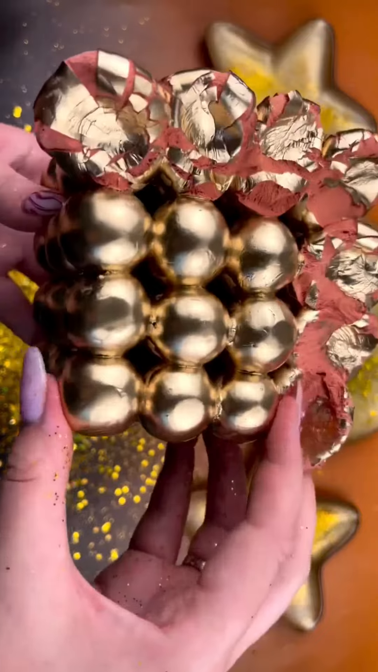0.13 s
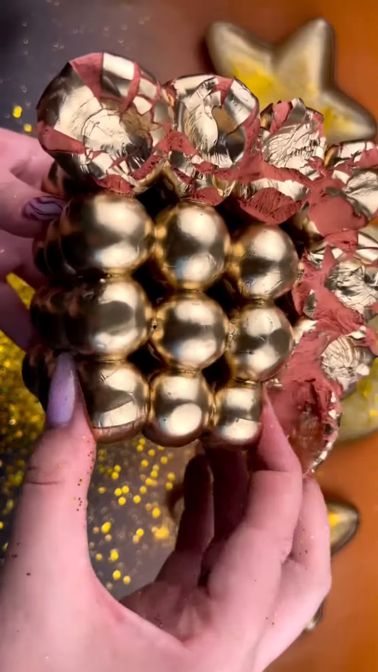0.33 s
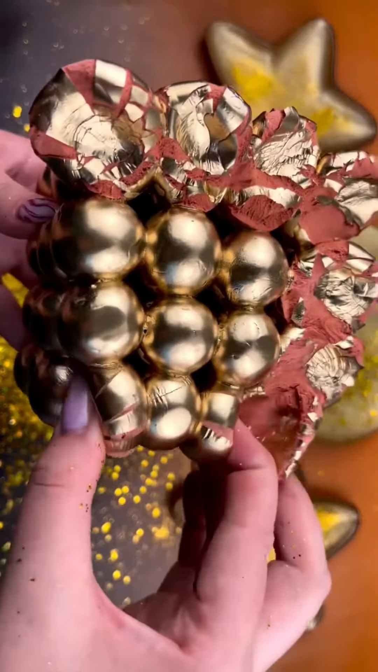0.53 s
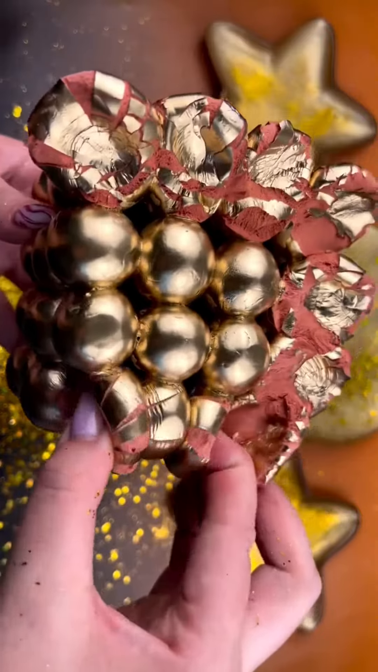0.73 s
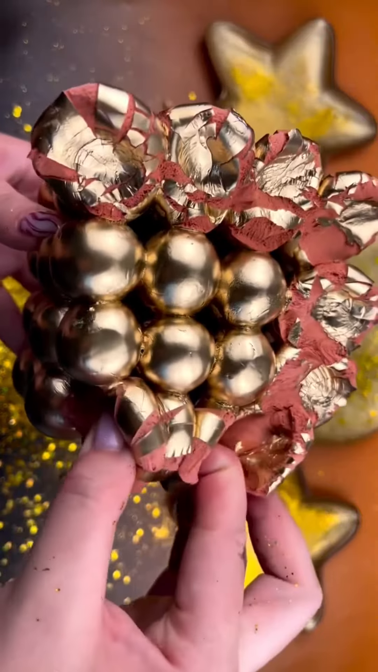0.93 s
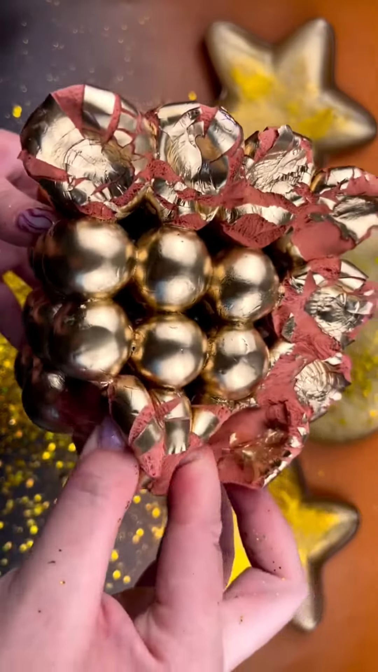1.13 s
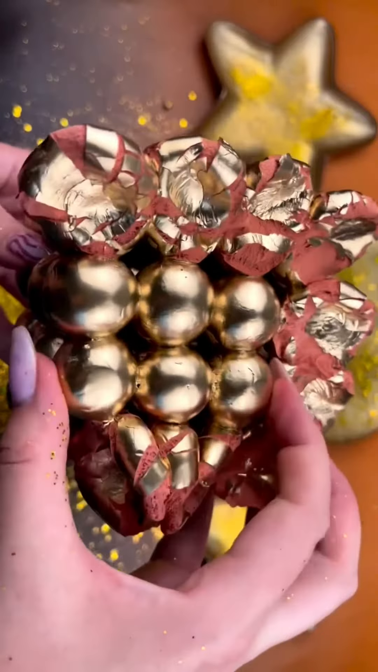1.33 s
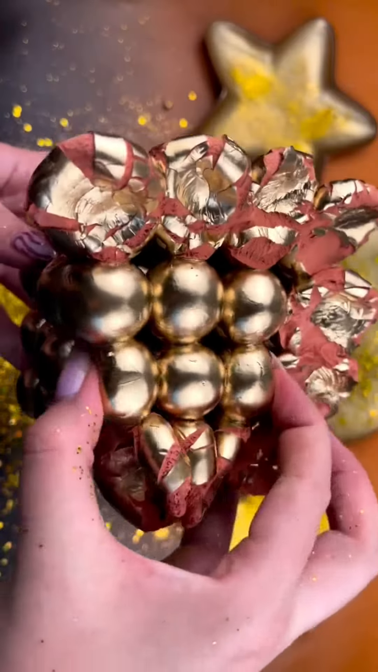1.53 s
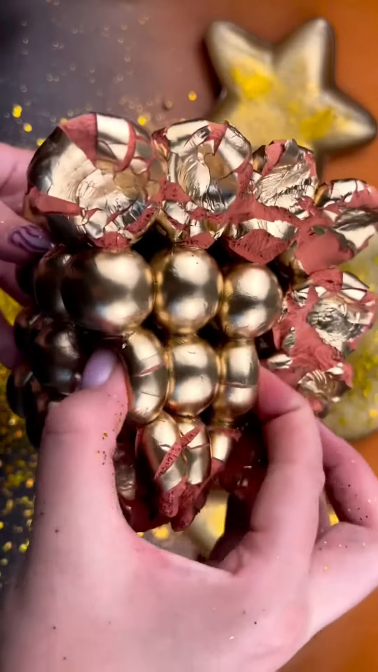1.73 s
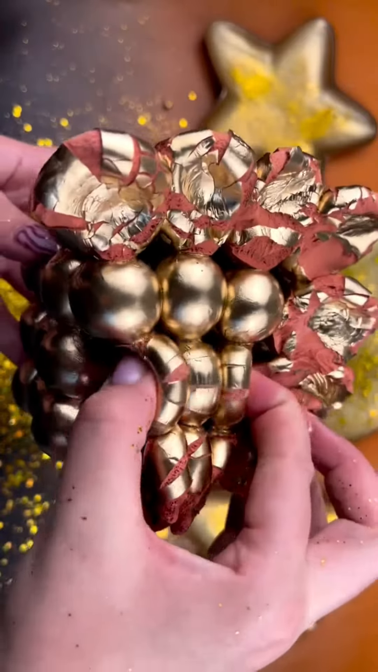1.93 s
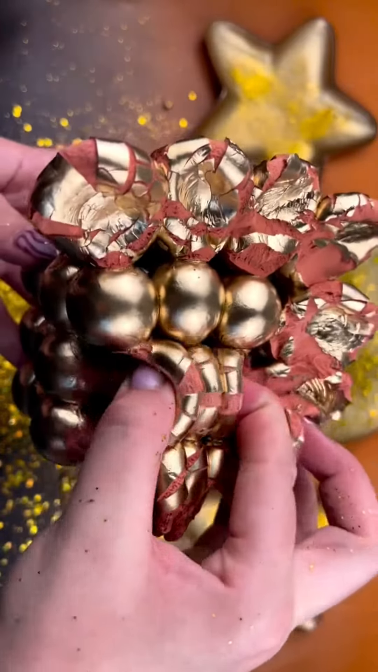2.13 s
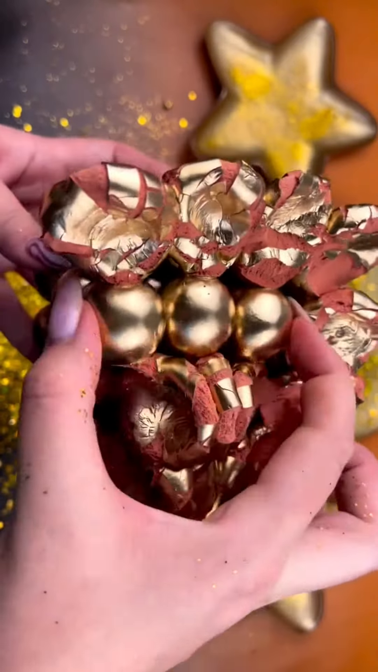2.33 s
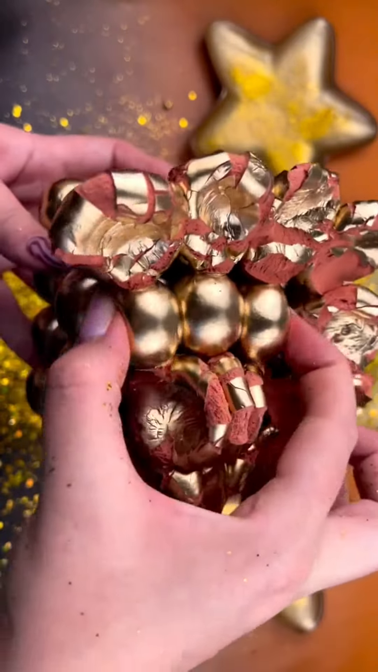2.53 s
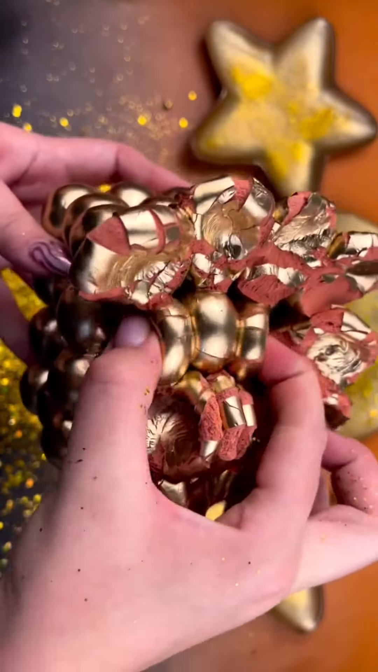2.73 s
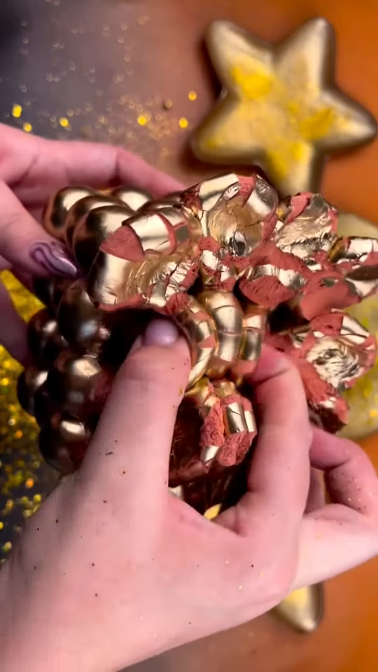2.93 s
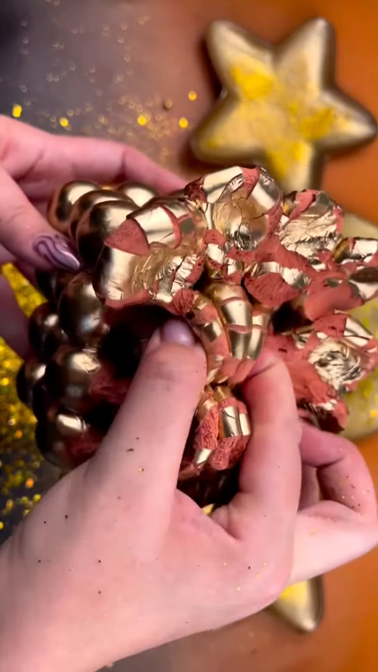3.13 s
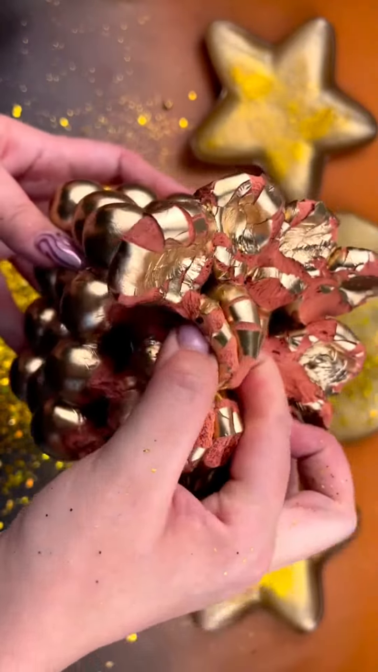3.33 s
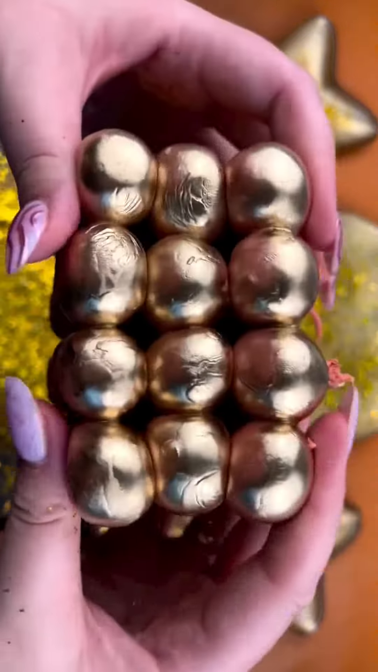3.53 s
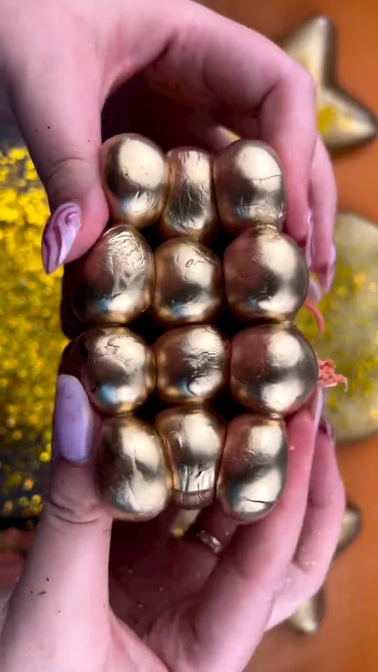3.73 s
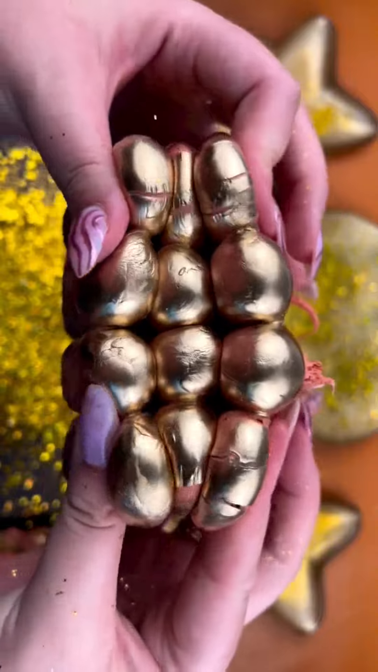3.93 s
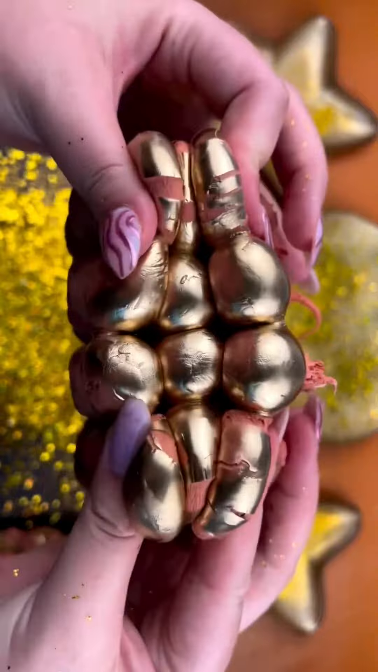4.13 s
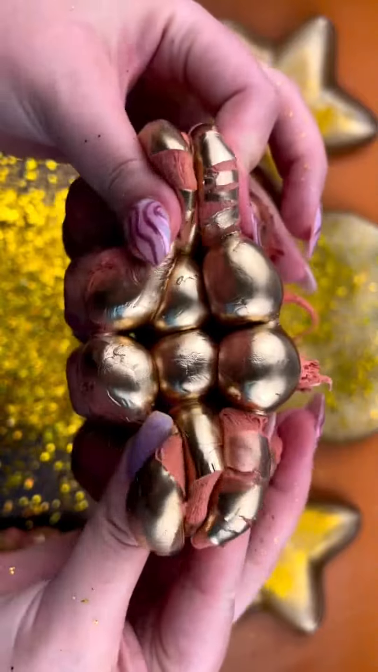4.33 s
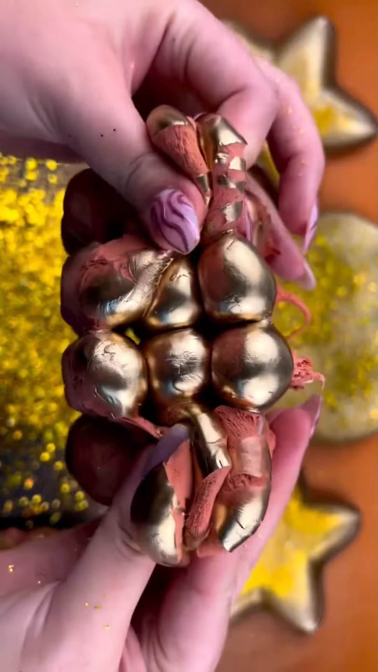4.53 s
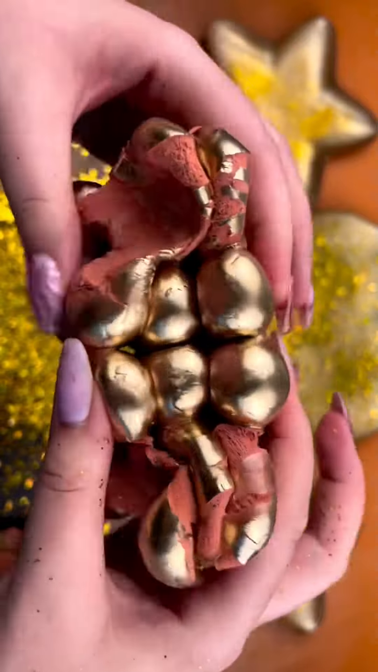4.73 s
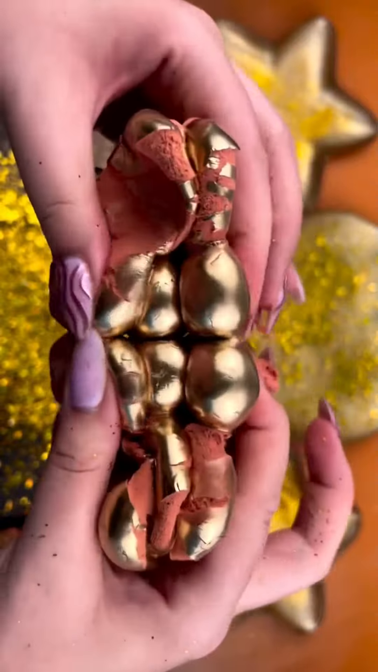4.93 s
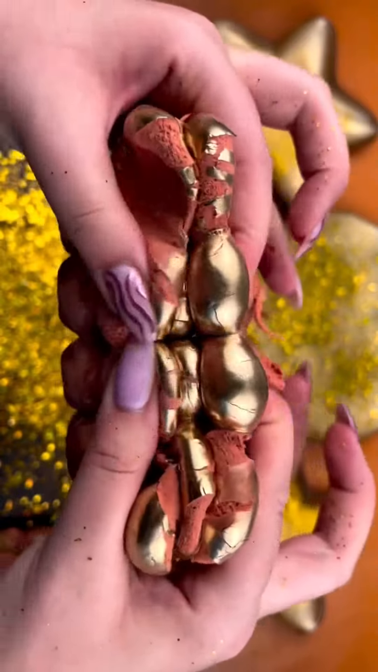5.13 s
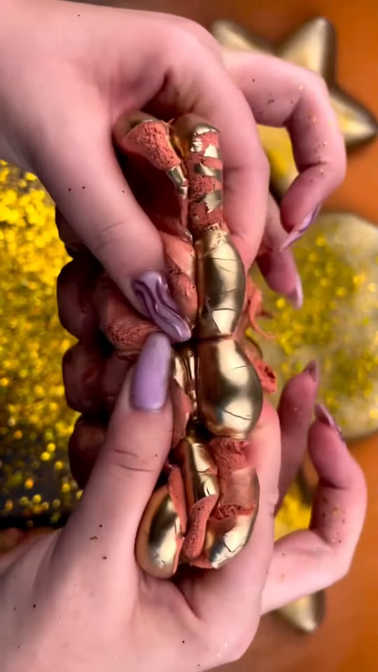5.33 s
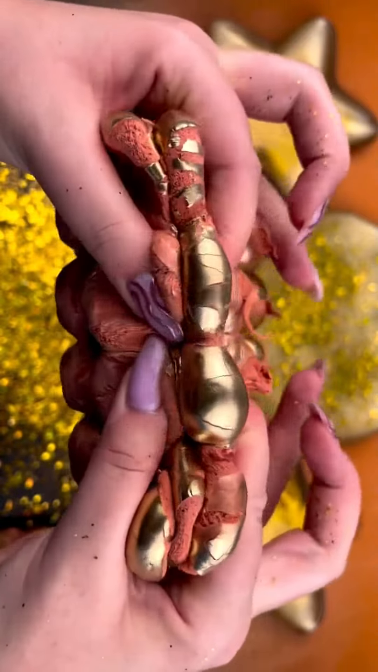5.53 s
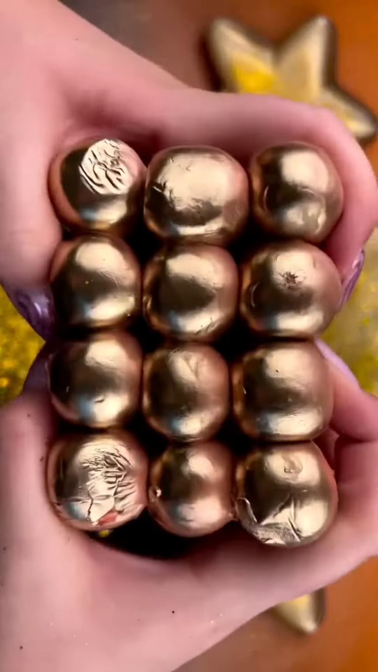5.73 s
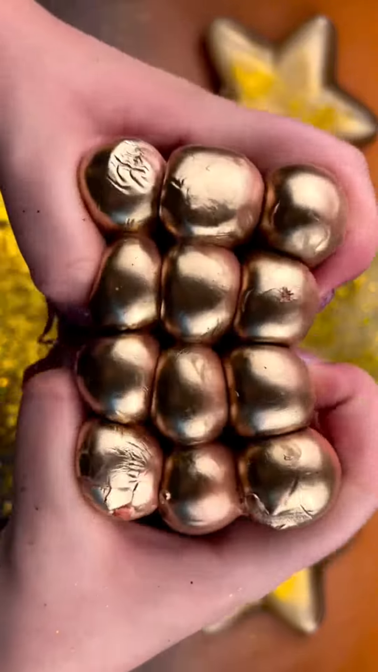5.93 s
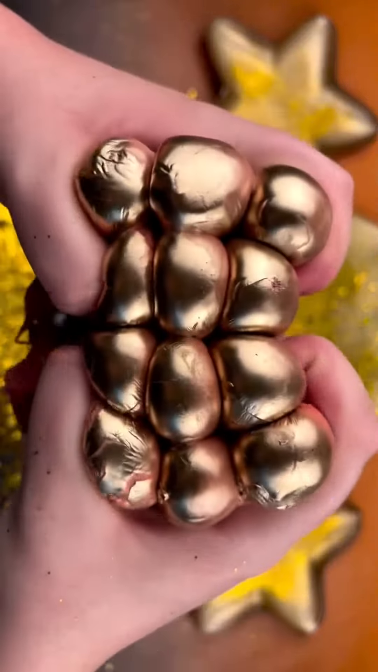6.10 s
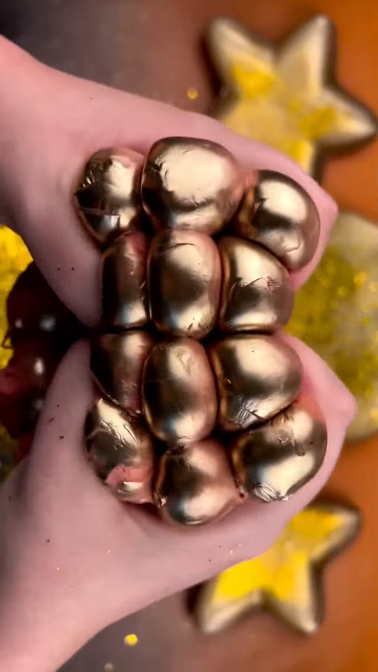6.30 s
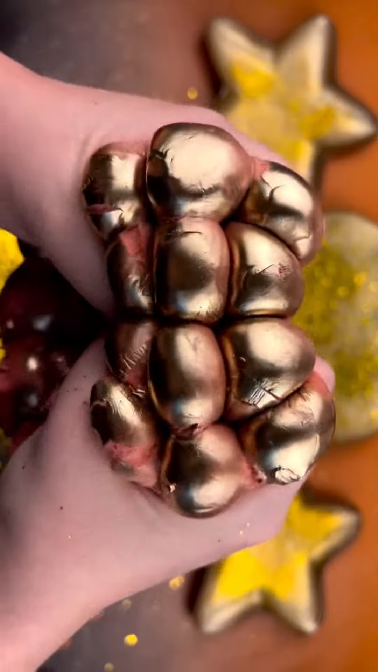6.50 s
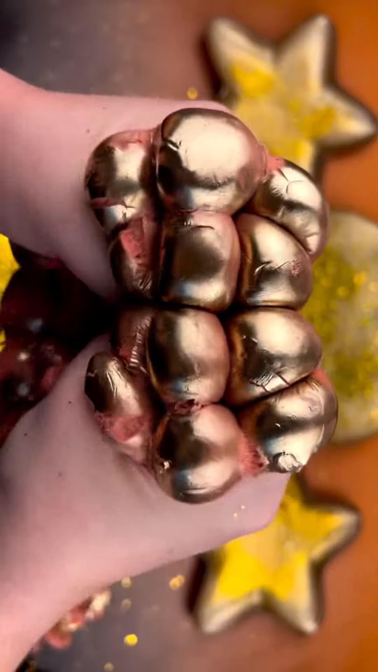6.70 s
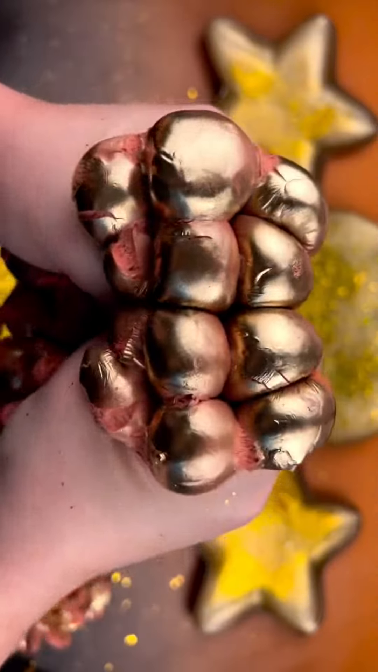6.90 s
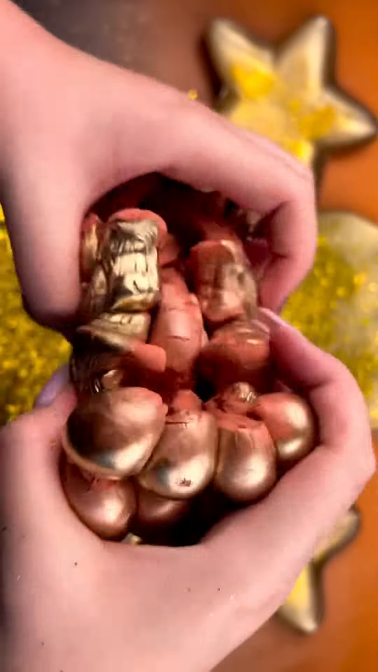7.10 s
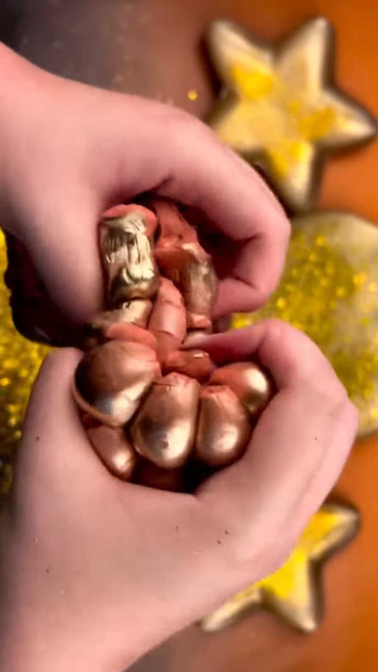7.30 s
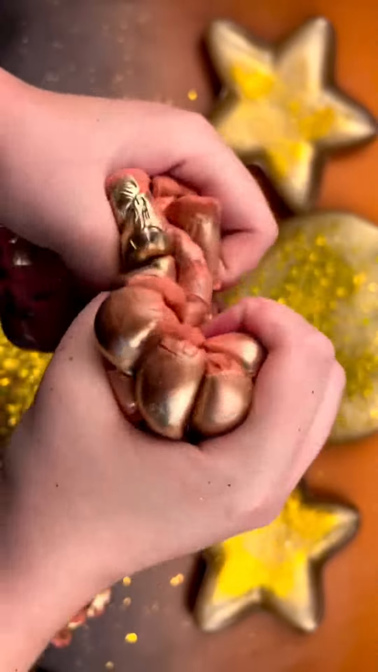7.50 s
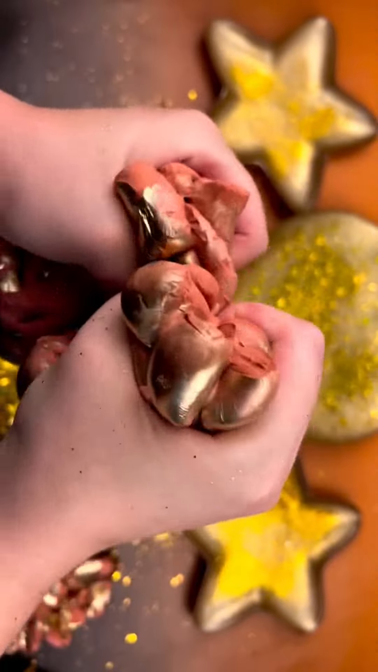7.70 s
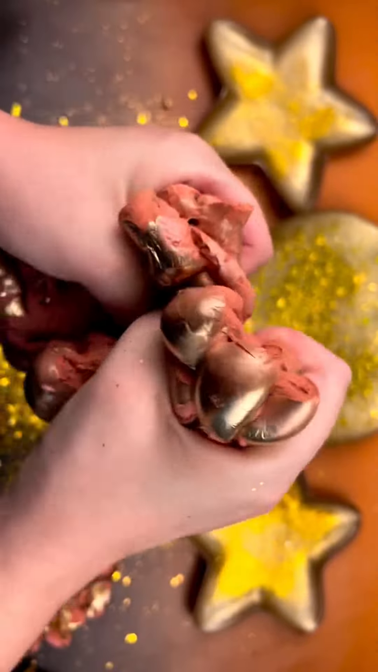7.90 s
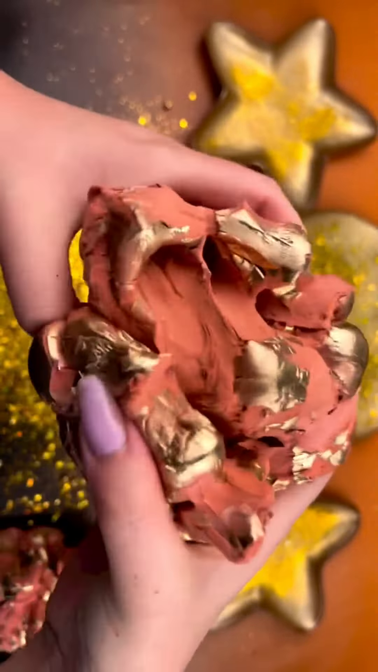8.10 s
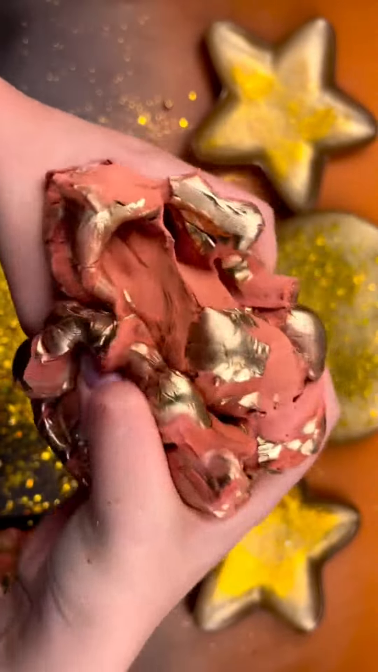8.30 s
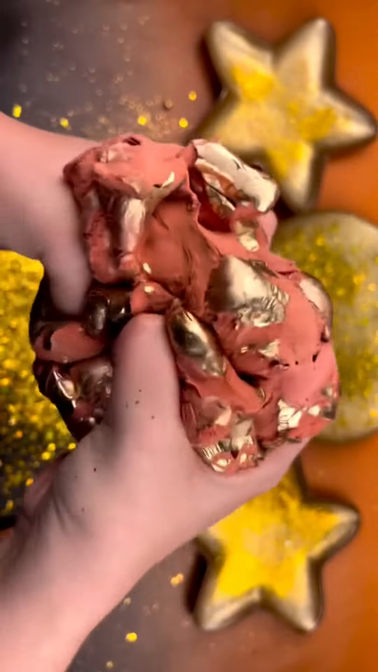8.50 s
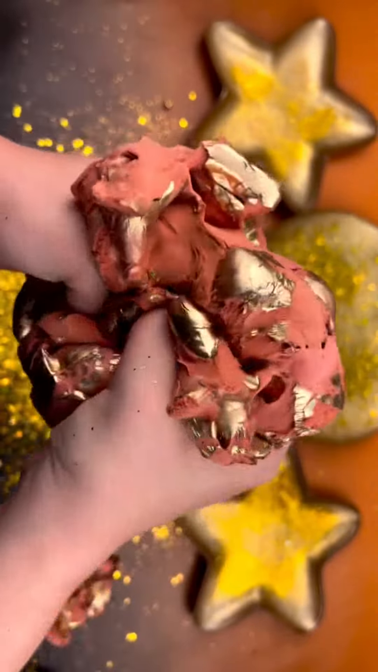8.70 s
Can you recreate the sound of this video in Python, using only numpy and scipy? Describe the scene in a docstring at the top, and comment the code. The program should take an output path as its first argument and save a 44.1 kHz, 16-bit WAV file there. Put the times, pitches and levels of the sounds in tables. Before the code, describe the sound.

Hands squeeze balls of soft clay coated in dried paint. The shell breaks in repeated bursts of fine crackle and sharp snaps, with occasional low pops and a faint squish underneath. Each squeeze swells and fades, with brief pauses between. Near the end the clay gives one short, gritty rip, followed by softer crackling. It is heard close up in a small, quiet room.

```python
"""Dried paint cracks as hands crush the balls of soft clay it coats, close by in a small room.
Each squeeze swells, holds and fades. Brittle fracture gives loud snaps, which set off avalanches of
fine crackle and excite the modes of the painted shell. Some breaks give a low pop that glides down.
The soft clay squishes underneath and once rips apart, over a quiet room tone."""
import sys
import numpy as np
from scipy import signal
from scipy.fft import rfft, irfft, next_fast_len
from scipy.io import wavfile
from scipy.ndimage import uniform_filter1d, minimum_filter1d, map_coordinates

SR = 44100
rng = np.random.default_rng(int(sys.argv[2]) if len(sys.argv) > 2 else 0)


def file_out(sig):
    """Save sig as 16-bit WAV at sys.argv[1]."""
    # one column per channel
    cols = np.atleast_2d(sig).T
    # limit, then scale
    lim = np.clip(cols, -1, 1)
    pcm = np.round(lim * 32767).astype(np.int16)
    wavfile.write(sys.argv[1], SR, pcm)


N = 385950
TOP_HZ = 13250
CREEP_S = .0015  # a crack creeps this long before it runs


def amp(db):
    """Amplitude ratio of a level in decibels."""
    return 10 ** (np.asarray(db) / 20)


def unit(x):
    """Normalisation to rms 1."""
    return x / np.sqrt(np.mean(x ** 2) + 1e-20)


def along(points, hz):
    """Interpolation of (Hz, value) points on a log frequency axis."""
    knots_hz, values = np.transpose(points)
    return np.interp(np.log(hz + 1), np.log(knots_hz + 1), values)


def filtered(x, response):
    """Linear filtering: the spectrum times a frequency response."""
    size = next_fast_len(N + SR // 2)
    return irfft(rfft(x, size) * response(np.fft.rfftfreq(size, 1 / SR)), size)[:N]


def noise(colour, grains_per_s=SR):
    """Coloured shot noise of rms 1; sparse grains sound gritty."""
    grains = rng.standard_normal(N) * (rng.random(N) < grains_per_s / SR)
    return unit(filtered(grains, lambda hz: amp(along(colour, hz))))


def placed(times, sounds):
    """Superposition of short sounds (rows), each starting at its time."""
    index = np.round(np.maximum(times, 0) * SR).astype(int)[:, None] + np.arange(sounds.shape[1])
    return np.bincount(index.ravel(), sounds.ravel(), N)[:N]


def wobble(knots_per_s):
    """Smooth modulation: a spline through random knots."""
    return map_coordinates(rng.standard_normal(2000), [np.arange(N) * knots_per_s / SR], mode="mirror")


# Spectrum of the room's background. Each row: frequency in Hz, gain in dB.
ROOM_TONE_COLOUR = [(20, -14), (45, -16.5), (75, -0.5), (110, -4), (200, -9.5), (500, -16), (2000, -25),
                    (12000, -25)]

def room_tone():
    """Stationary noise, strongest in the bass."""
    return amp(-68) * noise(ROOM_TONE_COLOUR)


# Grips of the hands. Each row: start, attack, hold and fade in seconds, level in dB,
# loss over the fade in dB, moisture (dull over bright) in dB.
SQUEEZES = [(0.07, .03, .03, .05, -57, 6, -1), (0.19, .02, .04, .02, -57, 0, -11),
            (0.265, .03, .03, .06, -31.5, 10, -9), (0.387, .03, .24, .22, -33, 10, -7.5),
            (0.894, .03, .03, .33, -32, 17, -0.5), (1.411, .04, .1, 0.033, -50, 1, 0),
            (1.576, .035, .28, .11, -31, 10, -4.5), (1.95, .11, .16, .125, -35, 4, -4),
            (2.385, .015, .02, .08, -50, 5, -4), (2.489, .05, .47, .22, -33, 7, -4.5),
            (3.2, .03, .03, .175, -50, 6, 0.5), (3.555, .015, .03, .01, -50, 0, -7),
            (3.598, .04, .32, .16, -28, 8, -5.5), (4.101, .07, .06, .3, -30, 12, -5),
            (4.5, .04, .27, .08, -48, 2.5, -5.5), (4.859, .12, .24, .24, -30, 4, -7),
            (5.449, .04, .02, .11, -43, 6, 0.5), (5.581, .07, .03, .12, -41, 5, 4),
            (5.78, .13, .24, .1, -25.5, 4, 6), (6.17, .08, .16, .58, -26, 22, 3.5),
            (6.96, .17, .41, .3, -29, 8, 0.5), (7.75, .05, .03, .12, -35, 12, -7),
            (7.909, .05, .12, .09, -37, 10, 2), (8.13, .08, .28, .3, -33, 1, 3)]

def hands(rise_db=24, release_db_per_s=451.5, resting_db=-76):
    """Envelopes of grip and moisture in dB: a squeeze swells, holds, fades as the shell yields, stops."""
    start, attack, hold, fade, db, loss_db, moisture_db = np.transpose(SQUEEZES)[:, :, None]
    clock = np.arange(0, N / SR, .001)
    age = clock - start
    fading = age - attack - hold
    squeeze_db = db - rise_db * np.maximum(1 - age / attack, 0)
    squeeze_db -= loss_db * np.clip(fading / fade, 0, 1)
    squeeze_db -= release_db_per_s * np.maximum(fading - fade, 0)
    per_sample = lambda curve: np.interp(np.arange(N) / SR, clock, curve)
    grip_db = per_sample(np.maximum(squeeze_db.max(0), resting_db))
    grip_db += 1.3 * wobble(22)  # the shell gives way in small fits
    patches_db = 3 * wobble(22)  # dry paint and wet clay take turns under the fingers
    return grip_db, per_sample(moisture_db[squeeze_db.argmax(0), 0]) + patches_db


def cracks(colour, dull_db, sharp_db, resonance_db, flutter_db, flutter_t60, size):
    """Brittle fracture in clicks of energy 1: a crack creeps, runs, and the loosened flake flutters."""
    count = len(dull_db)
    t = np.arange(size) / SR - CREEP_S
    after = np.maximum(t, 0)
    run_t60 = .0022 * amp(np.clip(-.5 * sharp_db, -3, 6))[:, None]  # blunt cracks run longer
    creep = amp(-11.5 + 13 * t / CREEP_S)
    release = amp(-60 * after / run_t60) + amp(flutter_db - 60 * after / flutter_t60)
    push = rng.standard_normal((count, size)) * np.where(t < 0, creep, release)
    push[:, round(CREEP_S * SR)] = 0.69 * rng.choice([-1, 1], count)  # the instant of breaking
    hz = np.fft.rfftfreq(size, 1 / SR)
    # wide flakes sound dull and resonate lower, small ones sound sharp
    dull_band = along([(700, 0.98), (1700, 1.0), (2900, 0.43)], hz)
    sharp_band = along([(4200, 0.046), (7000, 0.93)], hz)
    shape_db = along(colour, hz) + np.outer(dull_db, dull_band) + np.outer(sharp_db, sharp_band)
    flake_hz = 2900 * 2 ** (-.045 * dull_db + 0.42 * rng.standard_normal(count))
    shape_db += resonance_db / (1 + (np.log((hz + 1) / flake_hz[:, None]) / 0.11) ** 2)
    cepstrum = irfft(shape_db * np.log(10) / 20)  # minimum phase: the flake answers only after the push
    cepstrum[:, 1:size // 2] *= 2
    cepstrum[:, size // 2 + 1:] = 0
    click = irfft(rfft(push) * np.exp(rfft(cepstrum)) * (hz < TOP_HZ))
    return click / np.linalg.norm(click, axis=1, keepdims=True)


# Spectrum of fine cracks in paint. Each row: frequency in Hz, gain in dB.
FINE_COLOUR = [(60, -34), (250, -19), (700, -17), (1100, -10), (1600, -6), (2300, -6.5), (3100, -1.5),
               (4500, -3.5), (6500, -5), (9500, -9.5), (12000, -7.5), (14000, -20)]

def crackle(effort_db, moisture_db, level_db, scatter_db, count):
    """Acoustic emission: random cracks grow denser and louder with effort, duller with moisture."""
    density = amp(.35 * effort_db)
    density *= count / density.sum()  # cracks per sample
    thresholds = np.arange(count) + 2 * rng.random(count)
    onsets = np.minimum(np.searchsorted(np.cumsum(density), thresholds), N - 1)
    bulk, dull, sharp = np.clip(rng.standard_normal((3, count)), -2, 2)
    dull_db = 0.62 * moisture_db[onsets] + 3 * dull
    sharp_db = -.5 * moisture_db[onsets] + 4 * sharp
    click = cracks(FINE_COLOUR, dull_db, sharp_db,
                   resonance_db=9, flutter_db=-15, flutter_t60=.025, size=512)
    strength = unit(amp(scatter_db * bulk)) * amp(effort_db[onsets] + level_db) / np.sqrt(density[onsets])
    return placed(onsets / SR - CREEP_S, click * strength[:, None])


def crumbs(effort_db, moisture_db):
    """Friction: dry crumbs of paint grind in a dense stream of tiny ticks."""
    level_db = effort_db - 5 - 0.083 * np.maximum(moisture_db, 0)
    return amp(level_db) * noise(FINE_COLOUR, grains_per_s=2200)


# Spectra of moist clay tearing and squishing. Each row: frequency in Hz, gain in dB.
TEARING_COLOUR = [(300, -30), (800, -13.5), (1150, -13.5), (1800, -6.5), (2600, -7), (4000, -8),
                  (8000, -11.5)]
SQUISH_COLOUR = [(30, -20), (80, 3), (150, -5.5), (300, 3.5), (600, 3.5), (1200, -24.5), (3000, -31.5)]

def clay(effort_db, moisture_db):
    """Plastic deformation: clay tears, and squishes in lumps that grow less than the effort does."""
    tearing = amp(effort_db + moisture_db - 0.5) * noise(TEARING_COLOUR, grains_per_s=2200)
    squish = amp(-35 + 0.73 * effort_db + 2.3 * wobble(30)) * noise(SQUISH_COLOUR)
    return tearing + squish


# Loud breaks of the shell. Each row: time in seconds, relative level in dB,
# dull-band boost in dB, sharp-band boost in dB.
SNAPS = [(0.1012, -34, -1, 12), (0.2073, -42.5, -11.5, 13.5), (0.2142, -34.5, -23.5, 6.5),
         (0.2825, -13.5, -4, -1.5), (0.2925, -22, -6.5, -0.5), (0.3142, -14.5, -7.5, -2.5),
         (0.3246, -10.5, -2, -4), (0.4037, -10.5, -3.5, 1.5), (0.4965, -22.5, 1, -1.5),
         (0.5028, -12, 6.5, 1), (0.552, -16, 4, -0.5), (0.5755, -11.5, 2, 3), (0.619, -18, 6.5, 16),
         (0.639, -8, 0.5, -1), (0.6608, -14, 3.5, 0), (0.8003, -16, -1.5, 5), (0.8361, -25.5, -9.5, 4),
         (0.8472, -20.5, -8.5, 8), (0.854, -18.5, -3, 6), (0.9203, -14.5, -25, -1.5), (1.139, -25, 4.5, -3),
         (1.2883, -34, -3, 8.5), (1.428, -34.5, 4.5, 5), (1.4519, -25.5, -3.5, -2.5),
         (1.486, -34, -2.5, -5), (1.5248, -22, -4, 2), (1.5937, -20.5, 1, 10.5), (1.5998, -20, 0, -3),
         (1.613, -19.5, -6, -5), (1.6315, -17.5, 4.5, -0.5), (1.6719, -11, 3, -2.5),
         (1.6864, -21, -3.5, -6), (1.7167, -13, 6.5, -4.5), (1.7676, -16.5, 9, 5), (1.7817, -14.5, 2, 3.5),
         (1.8091, -14, 7, -1), (1.8181, -9, 3, -1), (1.8488, -16, -0.5, -8), (1.872, -6, -3.5, -2.5),
         (1.892, -13.5, 5.5, 1.5), (1.9522, -17.5, 6, -1), (2.0096, -22.5, 5, 6.5), (2.064, -18.5, 3, 4),
         (2.0952, -19.5, 9.5, 9), (2.1605, -17, 8, 17), (2.2125, -18, 9.5, -11.5), (2.2816, -18, 5, 4),
         (2.3298, -20, 4.5, 0.5), (2.3383, -23, 11, 4.5), (2.3951, -18.5, -8, 0), (2.4863, -27, -1, 4),
         (2.5223, -13, -2, -3), (2.5627, -19, 0.5, 15), (2.5718, -14, -2.5, -5.5), (2.5857, -17, 4, -10),
         (2.6122, -11, 4.5, -2.5), (2.618, -23.5, -10, -11), (2.6386, -17.5, 3, -1), (2.6463, -17, 6.5, 1),
         (2.6782, -17, 0.5, 6), (2.7317, -21.5, -1, 2), (2.7477, -13, 8.5, -3.5), (2.7714, -13, 1, 4),
         (2.8024, -10.5, 4, 2), (2.863, -18, 9, 5.5), (2.8905, -19, 5, 21), (2.9484, -17, 5, 9),
         (2.9854, -12.5, 2.5, -1), (2.9998, -18.5, 10.5, -1.5), (3.0911, -23, 0, -5), (3.1126, -22.5, 7, 3),
         (3.1306, -17.5, 14, 12), (3.1621, -19, 3.5, 11.5), (3.1906, -23.5, -5.5, 0), (3.239, -27.5, 1, 1),
         (3.565, -29, 1.5, -0.5), (3.5746, -36, 5, 5.5), (3.6189, -19.5, 1.5, 5), (3.6399, -15.5, 5, -4),
         (3.6617, -15.5, -5, -10), (3.675, -15, -1.5, -8.5), (3.6913, -19.5, -6, -5.5),
         (3.7161, -16, 4.5, 5), (3.748, -14, 1.5, 8), (3.7817, -13.5, 0, 0), (3.7908, -8, 4, 2.5),
         (3.8191, -10.5, 2, -6.5), (3.8429, -11.5, 2.5, -7), (3.8887, -10.5, 7, 0.5),
         (3.8997, -25.5, 7.5, -18), (3.9235, -12, 2, -5), (3.941, -10.5, 1.5, -5.5), (4.047, -18.5, 15, 5),
         (4.0524, -12.5, 1.5, 6.5), (4.1474, -17.5, 2, 4), (4.181, -14, 7.5, 2), (4.2329, -17, 7, -8),
         (4.2915, -21, 9, 6.5), (4.3691, -22, 12, 1), (4.4461, -19, 5, 0), (4.466, -13.5, 13.5, 3.5),
         (4.5038, -18, 5, 3), (4.6337, -32, -28.5, 7), (4.7596, -24, 4.5, 1.5), (4.797, -26, 0.5, 4),
         (4.814, -25, 7, 4), (4.8605, -15.5, 1.5, -3.5), (4.91, -17, 3.5, 2.5), (4.9357, -22.5, 0.5, -5),
         (4.9665, -16.5, 7.5, 9), (4.9852, -17, 4, -5.5), (5.0143, -13, 4, 2), (5.0471, -8.5, 2, 0),
         (5.1016, -18, 6, 3), (5.143, -13.5, -2, -5.5), (5.1886, -15, 17.5, 12.5), (5.2114, -18, 5, -12),
         (5.2637, -19, -2, -7), (5.2788, -17, 2.5, -1.5), (5.3328, -15.5, 9, 15), (5.4212, -17.5, 1.5, -7),
         (5.4584, -16.5, 0, -3.5), (5.5263, -21.5, -5.5, -2), (5.7256, -20.5, 0, 0), (5.8083, -21, 0, 1.5),
         (5.8346, -14.5, 1, 0.5), (5.8428, -17, 5, 6), (5.8709, -15, 0, 3.5), (5.8937, -10, -2, -4.5),
         (5.9051, -15.5, 7, 4), (5.9636, -23.5, -3, -7), (5.99, -12, -1, -3), (6.0044, -10, 5, -4),
         (6.0238, -12.5, 11, 0.5), (6.0298, -13, 4, 7), (6.0419, -12.5, 8.5, -10.5), (6.0936, -16, 7, -9),
         (6.1165, -9, 10.5, -18), (6.1222, -24, 2, -5), (6.1339, -21, 3, -12), (6.1743, -16, 3, -1),
         (6.2076, -15, 2, -7.5), (6.3678, -14, 4.5, 2), (6.381, -15, -1.5, -21.5), (6.4048, -13.5, 8, -3.5),
         (6.4164, -20, 0, -14.5), (6.4884, -11.5, -0.5, -11), (6.5396, -17, 0, -2), (6.546, -17, -4.5, -5),
         (6.5996, -17, -1, 9), (6.6085, -19, -1, 6), (6.647, -14.5, 7, 0.5), (6.8365, -18, -0.5, -5),
         (6.8806, -22, 0, -0.5), (7.089, -17, -12.5, -13), (7.1106, -26, 15, -2), (7.124, -15.5, 1.5, 3.5),
         (7.15, -22.5, 17, 19.5), (7.218, -15, 7.5, 6), (7.2516, -20, 10.5, 3.5), (7.3177, -18.5, 13, 2),
         (7.3469, -16, 17, 0.5), (7.3661, -13.5, 1, -1), (7.4048, -16.5, 3, -0.5), (7.457, -18.5, -14, 7.5),
         (7.474, -17.5, -15, -1), (7.536, -14.5, -11, 8.5), (7.5621, -20, -6.5, -6.5),
         (7.5957, -15, 3.5, 8), (7.6873, -11, -1.5, 14), (7.742, -18, 9, 7), (7.7922, -17, 2.5, 8),
         (8.1943, -20, 6, -11), (8.4344, -18, -4.5, 3), (8.628, -20, 12.5, 15)]
# Spectrum of a snap. Each row: frequency in Hz, gain in dB.
SNAP_COLOUR = [(25, -42.5), (70, -35.5), (250, -22), (700, -18), (1100, -12.5), (1600, -7.5), (2300, -6),
               (3100, 0.5), (4500, -0.5), (6500, -4.5), (9500, -6.5), (12000, -5), (14000, -16.5)]

def snaps():
    """Sudden release of strain: whole plates of paint break, each with its own level and colour."""
    times, db, dull_db, sharp_db = np.transpose(SNAPS)
    click = cracks(SNAP_COLOUR, dull_db, sharp_db,
                   resonance_db=3, flutter_db=-14, flutter_t60=.03, size=1024)
    return placed(times - CREEP_S, click * amp(db + 2.5)[:, None] * np.sqrt(0.0028 * SR))


def aftershocks(grip_db, kick_db=-19, decay_s=.014):
    """Relaxation: each snap adds a decaying avalanche to the grip's power, giving the effort in dB."""
    times, db = np.transpose(SNAPS)[:2]
    kicks = placed(times, amp(db + kick_db)[:, None] ** 2)
    avalanche = signal.lfilter([1], [1, -np.exp(-1 / (decay_s * SR))], kicks)
    return 10 * np.log10(amp(grip_db - 1.5) ** 2 + avalanche)


# Modes of the first and later shells. Each row: frequency in Hz, bandwidth in Hz, gain in dB.
FIRST_MODES = [(1430, 89, 3), (1720, 99, -3.5), (2410, 80, -5), (3040, 96, -8), (3180, 95, -7),
               (4560, 390, -17.5)]
LATER_MODES = [(1076, 56, -7), (1780, 110, -7), (2320, 76, -4), (2840, 53, -13.5), (3380, 170, -20)]

def shell(breaks, next_piece_s=3.5):
    """Modal resonance: every crack rings the painted shell; later pieces have other modes."""
    def ring(modes):
        return filtered(breaks, lambda hz: sum(
            amp(db) * 1j * hz * width / (centre ** 2 - hz ** 2 + 1j * hz * width)
            for centre, width, db in modes))
    return np.where(np.arange(N) < next_piece_s * SR, ring(FIRST_MODES), ring(LATER_MODES))


# Reverberation times of the room. Each row: frequency in Hz, time to fall 60 dB in seconds.
ROOM_T60 = [(150, 0.38), (1000, 0.082), (3200, 0.19), (7000, 0.08), (13000, 0.87)]

def room(direct, delay_s=.003):
    """Reverberation: convolution with a noise tail in which each frequency decays at its own rate."""
    hz, t, spectra = signal.stft(rng.standard_normal(SR // 2), SR, nperseg=256)
    decay = amp(-60 * t / along(ROOM_T60, hz)[:, None])
    tail = signal.istft(spectra * decay, SR, nperseg=256)[1]
    delayed = np.pad(direct, (round(delay_s * SR), 0))
    return signal.fftconvolve(delayed, tail / np.linalg.norm(tail))[:N]


# Breaks that pop. Each row: start in seconds, relative level in dB.
POPS = [(0.313, -24), (0.4044, -29), (0.5738, -23), (0.6556, -26), (0.972, -23), (1.8712, -18.5),
        (2.3938, -30.5), (2.6377, -26.5), (2.7113, -22.5), (2.769, -28.5), (3.1292, -32.5), (3.8883, -28.5),
        (3.9212, -28), (4.0453, -17.5), (4.8592, -29.5), (4.9647, -22), (5.1004, -29), (6.0233, -32),
        (6.173, -29), (6.5377, -20.5), (7.123, -19.5), (7.316, -22.5), (7.5585, -24.5), (7.6835, -21.5),
        (8.0053, -15.5), (8.0224, -16), (8.4, -19.5)]
# Spectrum of a pop. Each row: frequency in Hz, gain in dB.
POP_COLOUR = [(20, -38), (55, -14), (110, -2.5), (300, 0.5), (700, 0), (1300, -4), (3000, -44)]

def pops(size=4096):
    """Dispersion: each frequency arrives the same number of its own cycles late, so a pop glides down."""
    times, db = np.transpose(POPS)
    turn, pace, depth = rng.random((len(times), 3)).T[:, :, None]
    hz = np.fft.rfftfreq(size, 1 / SR)
    colour = amp(along(POP_COLOUR, hz * (0.97 + 0.34 * depth)))  # no two pops have the same size
    delay_cycles = 1.5 * (.8 + 0.395 * pace)
    phase = 2 * np.pi * (turn - delay_cycles * np.log(hz + 1))
    pop = irfft(colour * np.exp(1j * phase))
    pop /= np.linalg.norm(pop, axis=1, keepdims=True)
    return placed(times, pop * amp(db + 15.5)[:, None])


# Dips between squeezes. Each row: start in seconds, end in seconds, gain in dB.
HUSHES = [(1.289, 1.395, -8), (2.349, 2.38, -23.5), (5.705, 5.724, -26)]

def hush(ramp_s=.0024):
    """Gating: a gain that drops abruptly in some pauses."""
    t = np.arange(N) / SR
    dip_db = sum(float(db) * ((t > start) & (t < end)) for start, end, db in HUSHES)
    return amp(uniform_filter1d(dip_db, round(ramp_s * SR)))


# Envelope of bare clay ripping. Each row: time in seconds, level in dB.
RIP_ENVELOPE = [(7.925, -70.5), (7.935, -28.5), (7.955, -49.5), (7.97, -20.5), (7.995, -16.5), (8.012, -14),
                (8.028, -16), (8.041, -24), (8.046, -80.5)]
# Spectrum of the rip. Each row: frequency in Hz, gain in dB.
RIP_COLOUR = [(40, -29), (120, -27), (300, -10.5), (700, -12), (1300, -4), (2100, 2.5), (3200, -3),
              (5000, -9), (12000, -15)]

def rip():
    """Tensile failure: strands of clay part in a gritty ripping swell that stops abruptly."""
    times, db = np.transpose(RIP_ENVELOPE)
    level_db = np.interp(np.arange(N) / SR, times, db, left=-np.inf, right=-np.inf)
    return amp(level_db) * noise(RIP_COLOUR, grains_per_s=3200)


def scene():
    """Superposition of breaking paint, yielding clay, faint reverberation and room tone."""
    grip_db, moisture_db = hands()
    effort_db = aftershocks(grip_db)
    hairlines = crackle(effort_db, moisture_db, level_db=2, scatter_db=10.5, count=3200)
    flakes = crackle(effort_db, moisture_db, level_db=-1, scatter_db=1, count=230)
    breaks = snaps() + flakes + hairlines
    rustle = crumbs(effort_db, moisture_db) + clay(effort_db, moisture_db)
    direct = amp(-1) * breaks + shell(breaks) + rustle + pops() + rip()
    crushing = direct + amp(-21.5) * room(direct)
    return (hush() * crushing + room_tone())[None]


def record(dry, ceiling=.98):
    """Peak limiting holds down the tallest snaps; a steep low-pass then limits the band."""
    needed_gain = np.minimum(1, ceiling / (np.abs(dry[0]) + 1e-9))
    gain = uniform_filter1d(minimum_filter1d(needed_gain, size=15), size=15)
    return filtered(dry[0] * gain, lambda hz: 1 / np.sqrt(1 + (hz / TOP_HZ) ** 160))[None]


dry = scene()
out = record(dry)
file_out(out)
```